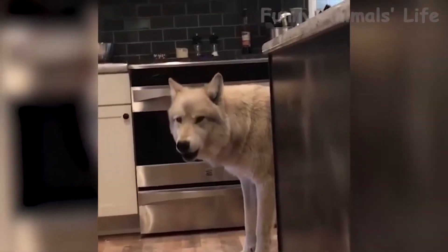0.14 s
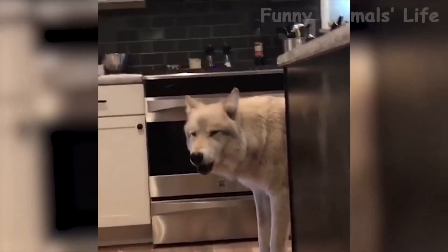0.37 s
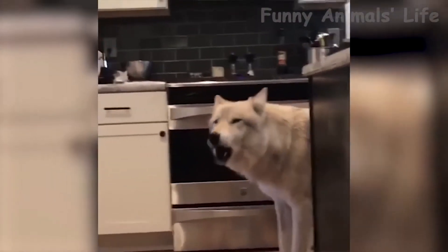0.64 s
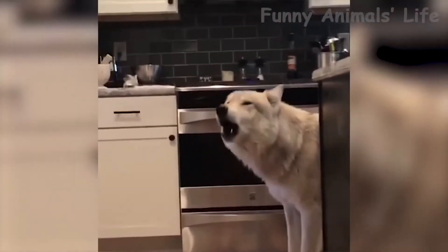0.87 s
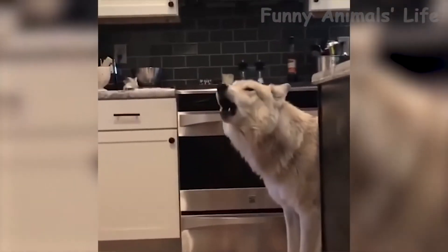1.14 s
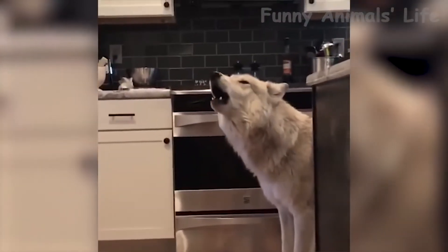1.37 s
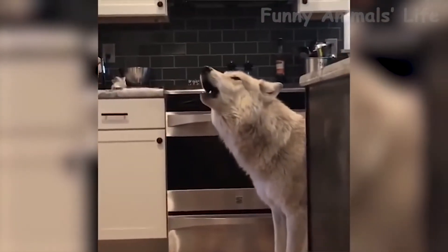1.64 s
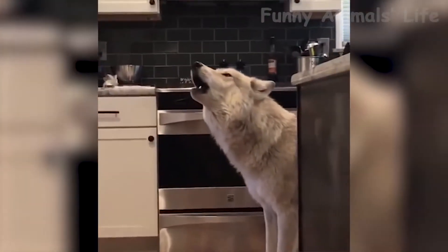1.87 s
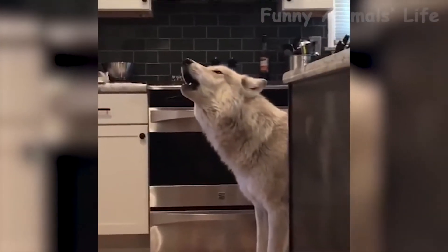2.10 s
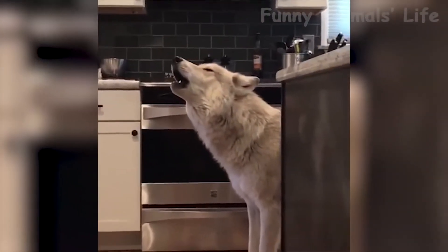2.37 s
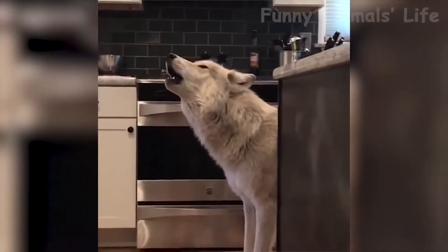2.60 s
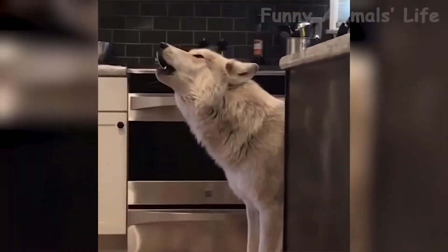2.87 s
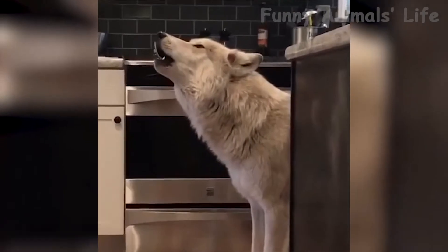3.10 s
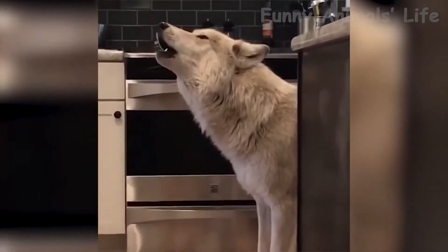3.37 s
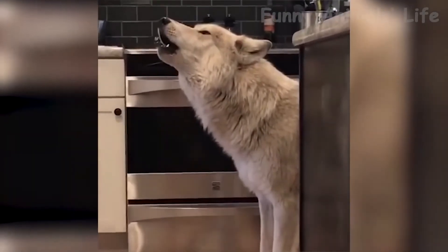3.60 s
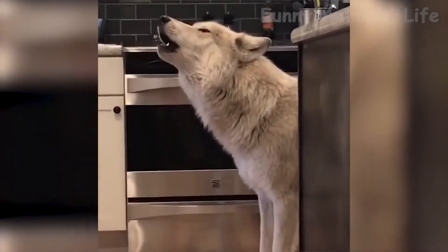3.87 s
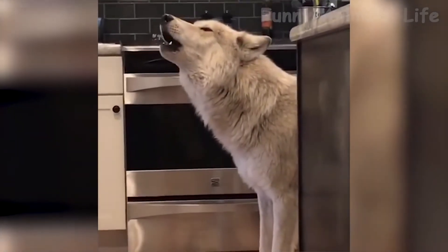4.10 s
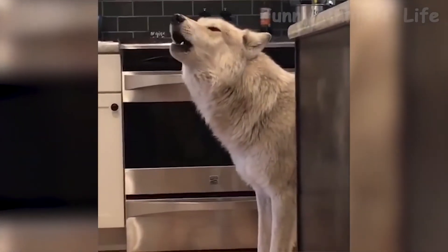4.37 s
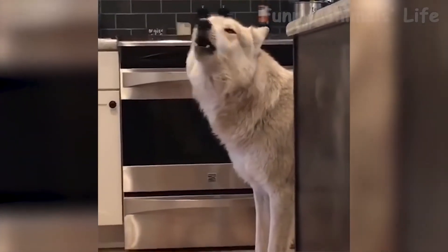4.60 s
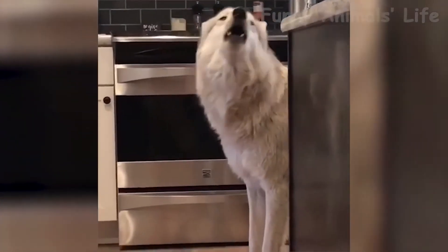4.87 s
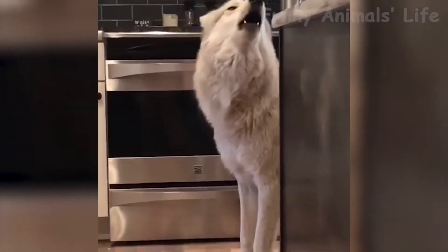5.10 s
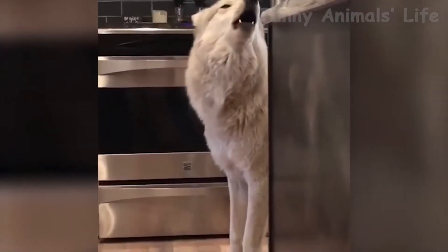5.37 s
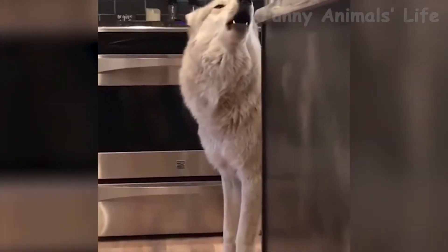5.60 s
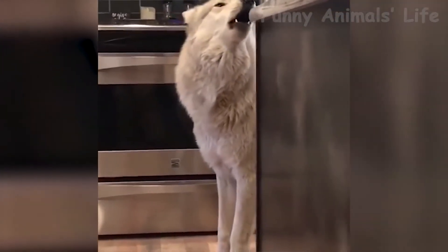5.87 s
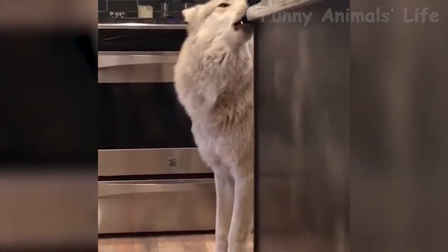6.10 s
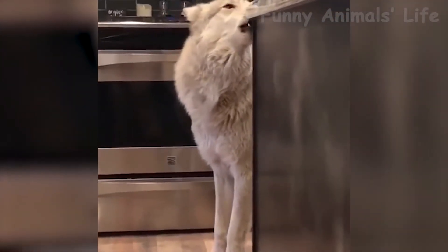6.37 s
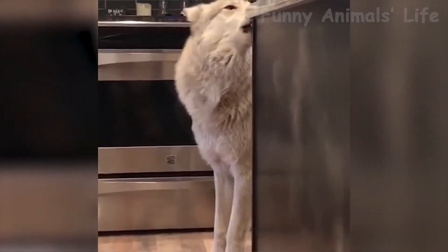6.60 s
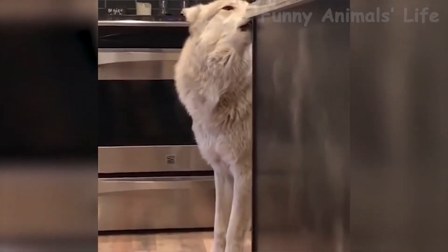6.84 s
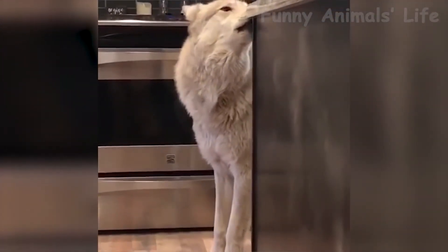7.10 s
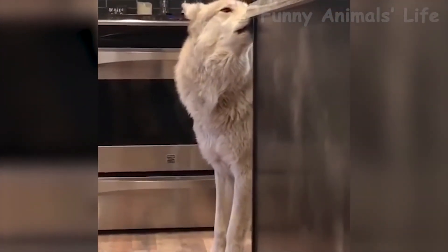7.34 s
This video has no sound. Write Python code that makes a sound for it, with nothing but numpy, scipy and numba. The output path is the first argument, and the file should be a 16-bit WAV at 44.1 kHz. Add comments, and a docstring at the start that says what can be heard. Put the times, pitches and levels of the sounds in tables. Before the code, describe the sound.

A large dog in a hard-walled kitchen breathes out with a tiny squeak, then gives one long howl that sags, breaks lower and slides away.

```python
"""A large dog in a hard-walled kitchen breathes out, then howls toward a phone: a clear high note that sags,
breaks down to a lower note, dips once and slides away. Steady vocal folds (summed sines) and escaping air
(noise) share one throat of resonances; a thin whine squeaks through the first breath. Wall echoes swell and
cancel the overtones as the pitch slides. Hush and a low appliance rumble sink back while the howl is loud;
a faint drone comes and goes during the dip."""
import sys
import numpy as np
from scipy import signal
from scipy.fft import rfft, irfft
from scipy.io import wavfile
from scipy.ndimage import uniform_filter1d
from numba import njit

SR = 44100
rng = np.random.default_rng(int(sys.argv[2]) if len(sys.argv) > 2 else 0)


def int16_out(signal):
    """Quantize to a 16-bit WAV file."""
    q = np.round(np.clip(np.atleast_2d(signal).T, -1, 1) * 32767)
    wavfile.write(sys.argv[1], SR, q.astype(np.int16))


def ratio(d):
    """dB to gain"""
    e = np.asarray(d, float) / 20
    return 10 ** e


N = 329689
TIME = np.arange(N) / SR  # seconds

# Spectrum of the kitchen hush. Each row: frequency in Hz, relative density in dB per Hz.
HUSH_SPECTRUM = [(15, -60), (25, -29.5), (74, -5.5), (233, -18), (279, -18), (2280, -35.5), (12300, -52.5),
                 (16000, -81), (22000, -120)]
# Room modes under the appliance. Each row: centre in Hz, width in Hz, mean level in dB before the hush sinks.
RUMBLE_MODES = [(68.6, 7.7, -63.5), (120, 13, -76), (167, 20, -77), (229, 47, -66.5)]
# Air escaping through the throat. Each row: time in seconds, gain in dB, treble tilt in dB at 4 kHz,
# resonance shift as the jaw opens as a ratio.
BREATH_PATH = [(.43, -108, 17, .95), (.48, -74, 9.5, 0.79), (.555, -89, 3, 1.2), (.57, -57, 2.5, .95),
               (.63, -49.5, 0.5, .97), (.76, -48, -1, 1.0), (.9, -54, 2, 1.0), (1.5, -52, 0.5, 1.022),
               (2.6, -51, -1.5, 0.99), (2.92, -49.5, -6, 1.05), (3.1, -62.5, -5, 1.0145),
               (4.3, -61, -10, 1.02), (4.8, -64.5, -4, 0.98), (5.3, -56.5, -8, 1.012),
               (6.3, -58.5, -8, 1.01), (7.0, -63.5, -9.5, 0.97), (7.2, -101.5, -15, 0.96)]
# Throat resonances. Each row: centre in Hz, width in Hz, gain for the voice in dB, gain for the breath in dB.
THROAT_RESONANCES = [(397, 81, -42, 0), (645.7, 89, -44.5, 2.5), (1160, 350, -34.5, 1.5),
                     (1659, 93, -3, -21.5), (2057, 370, 0, -8.5), (2532, 140, -1.5, -5),
                     (3705, 250, 3.5, -9.5), (4612, 440, -2, -6.5), (5734, 320, -6, -7),
                     (6390, 840, -15, -5), (9080, 2800, -22, -9), (9800, 510, -25, -12),
                     (10570, 1800, -26.5, -12)]
# Side cavities that swallow a band. Each row: centre in Hz, width in Hz.
SIDE_CAVITIES = [(4150, 220), (5270, 300)]
# Whine before the howl. Each row: time in seconds, pitch in Hz, gain in dB.
WHINE_PATH = [(.57, 2100, -110), (.6, 2144, -47.5), (.64, 2184, -47), (.68, 2240, -51.5), (.74, 2250, -66),
              (.8, 2255, -110)]
# Vocal folds, breaking to the lower note near 3 s. Each row: time in seconds, pitch in Hz.
FOLD_PITCH = [(0.78, 487.0), (0.92, 514.8), (1.06, 525.7), (1.24, 516.9), (1.75, 502.9), (1.96, 486.1),
              (2.2, 476.3), (2.4, 464.5), (2.66, 457.0), (2.78, 435.6), (2.87, 425.0), (2.93, 399.0),
              (2.945, 366.0), (3.0, 345.4), (3.16, 333.1), (3.56, 335.6), (3.7, 338.0), (4.2, 341.1),
              (4.46, 339.1), (4.64, 331.5), (4.84, 319.9), (5.1, 321.5), (5.17, 325.8), (5.24, 334.1),
              (5.5, 339.3), (5.85, 341.1), (6.1, 339.7), (6.44, 334.0), (6.7, 318.4), (7.07, 287.5),
              (7.2, 286.0)]
# How hard the dog howls. Each row: time in seconds, gain in dB.
HOWL_EFFORT = [(0.78, -33.5), (0.82, -25), (0.97, -18), (1.2, -12), (2.0, -20.5), (2.9, -19), (2.96, -17),
               (3.2, -20.5), (4.4, -17.5), (4.9, -22.5), (5.3, -18), (5.45, -16), (5.7, -19.5), (6.3, -17),
               (6.8, -31.5), (7.05, -39.5), (7.2, -63), (7.27, -75)]
# Upper overtones. Each row: time in seconds, gain in dB.
UPPER_GAIN = [(.78, -62), (.87, -50), (1.4, -57.5), (2.5, -56.5), (2.75, -65.5), (2.88, -56), (3.1, -62.5),
              (4.1, -60), (4.75, -67.5), (5.1, -61), (5.3, -50.5), (5.9, -55), (6.6, -66), (7.1, -78.5)]
# Overtones 1 to 4 over the effort. Each row: gain in dB of each overtone, for one stance.
HIGH_OVERTONES_DB = (0.0, -9, -39, -46.5)  # the high note
SIDE_OVERTONES_DB = (0.11, -9.5, -12.5, -32)  # the low note side-on
FRONT_OVERTONES_DB = (-0.1, -5, -17, -17)  # the low note facing the phone
# Lower, middle and top parts of the throat. Each row: lower edge in Hz, upper edge in Hz.
THROAT_PARTS = [(0, 3100), (3100, 4200), (4200, 13000)]
# Those parts over the upper gain, on the high note, side-on and facing. Each row: gain in dB of each part.
HIGH_THROAT_DB, SIDE_THROAT_DB, FRONT_THROAT_DB = (3, -5, -2.5), (-1.5, -1, -3), (2.5, -4.5, -5)
# Where direct sound and wall echoes add or cancel, for each stance.
# Each row: centre in Hz, half-width in Hz, gain at the centre in dB.
SIDE_WALLS = [(405.2, 3.1, -10.5), (412.2, 12.0, -18.6), (447.0, 10.7, -9.0), (457.9, 1.3, -13.3),
              (465.7, 2.6, -8.7), (479.3, 2.2, -7.3), (506.5, 3.9, -24.5), (513.9, 17.9, -24.0),
              (671.0, 3.1, -13.6), (681.0, 2.7, -7.6), (821.3, 16.0, -12.3), (859.3, 4.6, -12.0),
              (881.2, 37.6, -13.6), (917.5, 2.0, -9.4), (921.1, 2.0, 6.6), (937.1, 3.9, -19.5),
              (955.4, 4.6, -13.1), (962.4, 2.7, -7.0), (978.6, 3.8, -21.3), (1009.5, 2.4, 4.9),
              (1021.4, 3.7, -15.6), (1050.3, 2.3, -13.1), (1093.1, 19.7, -19.6), (1262.3, 21.4, 12.0),
              (1336.2, 11.6, 12.0), (1354.1, 5.9, 8.3), (1361.8, 2.5, -4.6), (1393.8, 3.9, -10.6),
              (1413.0, 4.0, 10.3), (1535.0, 35.0, 6.0), (2060.0, 60.0, 8.0)]
FRONT_WALLS = [(291.3, 4.9, 12.0), (302.8, 2.2, -9.6), (313.2, 4.2, 11.6), (320.2, 1.4, -6.8),
               (331.4, 4.8, -16.1), (582.8, 15.1, -10.7), (602.6, 6.1, 10.4), (645.7, 32.6, -16.7),
               (933.0, 11.8, 12.0), (952.8, 10.1, 12.0), (961.4, 10.9, -16.3), (971.6, 5.8, -11.0),
               (1012.2, 15.0, 12.0), (1015.7, 11.2, -16.5), (1171.1, 40.0, -20.7), (1237.6, 9.3, -11.3),
               (1300.0, 11.5, 5.7), (1322.7, 1.1, -15.5), (1331.9, 2.3, -6.2), (1359.7, 7.6, -15.4)]
# Low drone during the dip in pitch. Each row: time in seconds, centre in Hz, gain in dB.
DRONE_PATH = [(4.5, 155.7, -99), (4.65, 152, -67.5), (5.2, 153.2, -63.5), (5.3, 151.4, -93.5)]

HUSH_DB = -59.5  # before it sinks under the howl
ROOM_T60_S, ROOM_TOP_HZ = .45, 5000
ROOM_DB, UPPER_ROOM_DB = -16, -7  # echo of the whole dog, and of its upper overtones
RAISE_S, RAISE_LENGTH_S = 0.96, 0.23  # the muzzle lifts to howl side-on
BREAK_S, BREAK_LENGTH_S = 2.93, 0.012  # the voice breaks to the low note
TURN_S, TURN_LENGTH_S = 4.6, 0.4  # the dog swings round to face the phone
FOLD_JITTER = .0015  # spread of the pitch, as a ratio
ECHO_LAG_S = .025  # the echoes carry the pitch of this long ago
BEATING_DB = 6.5  # per overtone above the first, at a slide of one neper a second
FADING_DB = 1.5  # slow fading of the upper overtones
RASP_DB, RASP_HZ = -36, 279  # size of the unevenness before extra rasp, and its low-pass corner
RASP_BAND_HZ = [278, 1320]  # the lowest throat resonances
CRACK_DB = 13  # extra rasp at a slide of one neper a second
BREAK_RASP_DB, BREAK_SETTLE_S = 14, .08  # extra rasp as the voice breaks, and how fast it settles
# The lowest overtone falters through the break, then snaps back
CATCH_DB, CATCH_ENDS_S, CATCH_EDGE_S = -12, 2.943, .005


def level(x, db):
    """Scale to an rms level."""
    return x * ratio(db) / np.sqrt(np.mean(x ** 2))


def curves(table):
    """Columns of a table, sample by sample."""
    s, *columns = np.transpose(table)
    return [np.interp(TIME, s, c) for c in columns]


@njit
def svf(x, hz, width):
    """State-variable band-pass with a moving centre, gain 1 at the centre."""
    y, b, l = np.empty(len(x)), 0., 0.
    for i in range(len(x)):
        g, k = np.pi * hz[i] / SR, width / hz[i]
        g = g * (1 + g * g / 3 + 2 * g ** 4 / 15)  # tangent as a series
        v = (b + g * (x[i] - l)) / (1 + g * (g + k))
        b, l, y[i] = 2 * v - b, l + 2 * g * v, k * v
    return y


def resonate(x, hz, width):
    """A steep resonance: the band-pass twice."""
    once = svf(x, hz, 1. * width)
    return svf(once, hz, 1. * width)


def walk(rate):
    """Random levels held 1 / rate s and slewed twice; spread near 1."""
    k = int(SR / rate)
    held = np.repeat(rng.standard_normal(N // k + 1), k)
    return 1.3 * uniform_filter1d(uniform_filter1d(held, k), k)[:N]


def ramp(start_s, length_s):
    """Rises from 0 to 1."""
    return np.clip((TIME - start_s) / length_s, 0, 1)


def kitchen():
    """Broad hush, with low room modes under the appliance that swell slowly."""
    hz = np.maximum(np.fft.rfftfreq(N, 1 / SR), 1)
    knots_hz, knots_db = np.transpose(HUSH_SPECTRUM)
    colour_db = np.interp(np.log(hz), np.log(knots_hz), knots_db)
    hush = level(irfft(rfft(rng.standard_normal(N)) * ratio(colour_db), N), HUSH_DB)
    modes = 0
    for centre_hz, width, db in RUMBLE_MODES:
        mode = resonate(rng.standard_normal(N), np.full(N, 1. * centre_hz), width)
        modes = modes + ratio(db + 1.5 * walk(1.1)) * level(mode, 0)
    return hush + modes


def breath(db, hiss_db, shift, phase, voiced):
    """Turbulent air in the throat, puffed once a cycle while the folds vibrate; each band wanders and flickers."""
    air = rng.standard_normal(N) * (1 + .6 * voiced * np.cos(phase))
    bands = 0
    for k, (hz, width, _, air_db) in enumerate(THROAT_RESONANCES):
        tilt_db = hiss_db * np.clip((hz - 1300) / 2700, 0, 1.5)
        size = ratio(air_db + 3.4 * walk(8) + tilt_db)
        wandering_hz = hz * shift * (1 + 0.013 * walk(2.2))
        # the root evens out narrow and wide bands; neighbours alternate in sign
        band = resonate(air, wandering_hz, width) * np.sqrt(SR / width / 10)
        bands = bands + (-1) ** k * size * band
    return ratio(db) * bands * (TIME > BREATH_PATH[0][0])


def room(x, db):
    """Dense, dull reflections off the walls that die away after a short gap."""
    t = TIME[:SR // 2]
    tail = rng.standard_normal(len(t)) * np.exp(-np.log(1000) * t / ROOM_T60_S) * (t > .006)
    tail = signal.sosfilt(signal.butter(1, ROOM_TOP_HZ, fs=SR, output="sos"), tail)
    return signal.fftconvolve(x, ratio(db) * tail / np.sqrt(np.sum(tail ** 2)))[:N]


def whine():
    """A thin whine through the first breath: three unsteady harmonics, the second strongest."""
    hz, db = curves(WHINE_PATH)
    phase = 2 * np.pi * np.cumsum(hz * (1 + 0.0025 * walk(40))) / SR
    harmonics = sum(ratio(g + 8.0 * walk(25)) * np.sin((k + 1) * phase) for k, g in enumerate([-12, 0, -14]))
    return ratio(db) * harmonics


def by_stance(high_db, side_db, front_db):
    """One level for the high note, then one for each stance of the low note."""
    low_db = side_db + ramp(TURN_S, TURN_LENGTH_S) * (front_db - side_db)
    return high_db + ramp(BREAK_S, BREAK_LENGTH_S) * (low_db - high_db)


def wall_gain_db(hz, table):
    """Round swells and sharp dips where direct sound and echoes add or cancel, at a moving frequency."""
    coarse = slice(None, None, 64)  # every 64th sample is enough
    gain_db = sum(10 * np.log10(1 + (ratio(db) ** 2 - 1) / (1 + ((hz[coarse] - f) / half_width) ** 2))
                  for f, half_width, db in table)
    return np.interp(TIME, TIME[coarse], gain_db)


def echoes_db(hz):
    """Gain from muzzle to phone, changing as the muzzle lifts and the dog turns."""
    turn = ramp(TURN_S, TURN_LENGTH_S)
    side_db = ramp(RAISE_S, RAISE_LENGTH_S) * (1 - turn) * wall_gain_db(hz, SIDE_WALLS)
    return side_db + turn * wall_gain_db(hz, FRONT_WALLS)


def strong_overtones(hz, phase, slide):
    """Overtones 1 to 4 of the folds, each swelling and cancelling among the wall echoes."""
    effort_db = curves(HOWL_EFFORT)[0]
    late_hz = np.interp(TIME - ECHO_LAG_S, TIME, hz)
    catch = ramp(BREAK_S, CATCH_EDGE_S) - ramp(CATCH_ENDS_S, CATCH_EDGE_S)
    low = 0
    for k, stance_db in enumerate(zip(HIGH_OVERTONES_DB, SIDE_OVERTONES_DB, FRONT_OVERTONES_DB)):
        size = ratio(effort_db + by_stance(*stance_db) + echoes_db((k + 1) * late_hz))
        if k == 0:
            size = size * ratio(CATCH_DB * catch)
        # late echoes of the old pitch beat against the new one, more so in higher overtones
        size = size * ratio(BEATING_DB * slide * k * walk(32))
        low = low + np.sqrt(2) * uniform_filter1d(size, int(0.0017 * SR)) * np.sin((k + 1) * phase)
    return low


def rasp(low, slide):
    """Uneven cycle sizes heard in the lowest throat resonances, rougher where the voice slides or breaks."""
    uneven = signal.sosfilt(signal.butter(1, RASP_HZ, fs=SR, output="sos"), rng.standard_normal(N))
    settling = np.exp(-np.abs(TIME - BREAK_S) / BREAK_SETTLE_S)
    extra_db = CRACK_DB * slide + BREAK_RASP_DB * ramp(BREAK_S, BREAK_LENGTH_S) * settling
    rough = low * ratio(extra_db) * level(uneven, RASP_DB)
    return signal.sosfilt(signal.butter(4, RASP_BAND_HZ, "band", fs=SR, output="sos"), rough)


def upper_overtones(hz, phase, voiced, shift):
    """Faint overtones from the fifth up, which only the throat resonances let through."""
    # wall echoes fade them in five patterns shared in turn, with most flutter on the breathy high note
    fading = [ratio(FADING_DB * walk(rate) + 1.5 * (hz / 500) ** 2 * walk(45)) for rate in np.linspace(4, 8, 5)]
    source = sum(fading[k % 5] * (k * hz < 12000) * np.sin(k * phase + k * k) for k in range(5, 36))
    gain_db = curves(UPPER_GAIN)[0]
    high = 0
    for (lo, hi), *stance_db in zip(THROAT_PARTS, HIGH_THROAT_DB, SIDE_THROAT_DB, FRONT_THROAT_DB):
        # the voice rings in resonances narrower than the breath does
        part = sum(ratio(db) * resonate(source, f * shift, 0.75 * width)
                   for f, width, db, _ in THROAT_RESONANCES if lo < f < hi)
        high = high + voiced * ratio(gain_db + by_stance(*stance_db)) * level(part, -2.5)
    return high * (TIME < UPPER_GAIN[-1][0])


def howl(shift):
    """Nearly periodic folds: four strong overtones with a faint rasp, and faint upper ones through the throat."""
    hz = uniform_filter1d(curves(FOLD_PITCH)[0], int(0.0041 * SR))
    onset = np.clip((TIME - FOLD_PITCH[0][0]) / 0.01, 0, 1)
    voiced = onset * np.clip((HOWL_EFFORT[-1][0] - TIME) / 0.048, 0, 1)
    phase = 2 * np.pi * np.cumsum(hz * (1 + FOLD_JITTER * walk(60))) / SR
    slide = uniform_filter1d(np.abs(np.gradient(np.log(hz))) * SR, int(.12 * SR))
    slide = np.minimum(slide, .6)  # nepers a second
    low = strong_overtones(hz, phase, slide)
    low = low + rasp(low, slide)
    high = upper_overtones(hz, phase, voiced, shift)
    # the upper overtones also arrive by way of the walls, somewhat weaker than directly
    return voiced * low + high + room(high, UPPER_ROOM_DB), phase, voiced


def drone():
    """A faint low drone, noise in one narrow resonance, that comes and goes during the dip in pitch."""
    hz, db = curves(DRONE_PATH)
    return ratio(db) * level(resonate(rng.standard_normal(N), hz, 20), 0)


def scene():
    """The dog, its echo and the kitchen, whose hush and rumble sink as the howl gets loud."""
    air_db, hiss_db, shift = curves(BREATH_PATH)
    voice, phase, voiced = howl(shift)
    dog = voice + breath(air_db, hiss_db, shift, phase, voiced)
    for hz, width in SIDE_CAVITIES:
        dog = dog - svf(dog, np.full(N, 1. * hz), 1. * width)
    dog = dog + whine()
    loudness = np.sqrt(uniform_filter1d(dog ** 2, int(.3 * SR)) + 1e-12)
    duck = (1 + loudness / 0.011) ** -.25
    mix = dog + room(dog, ROOM_DB) + duck * kitchen() + drone()
    return mix[None]


def band_limit(x):
    """A steep low-pass at the top of the band."""
    return signal.sosfilt(signal.butter(12, 12440, fs=SR, output="sos"), x)


def record(dry):
    """The phone cuts the very top and the deep bass."""
    topped = signal.sosfilt(signal.ellip(8, .2, 60, 12400, fs=SR, output="sos"), dry)
    finished = signal.sosfilt(signal.butter(2, 26, "high", fs=SR, output="sos"), topped)
    return band_limit(finished)


dry = scene()
out = record(dry)
int16_out(out)
```